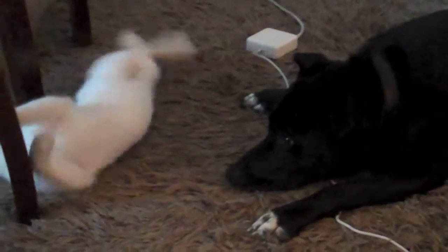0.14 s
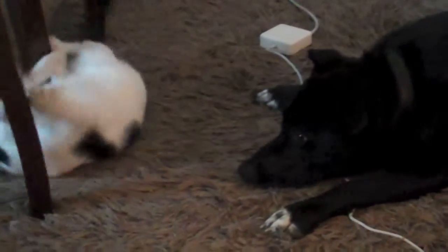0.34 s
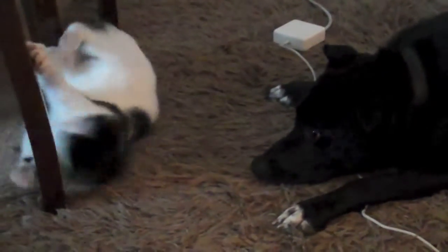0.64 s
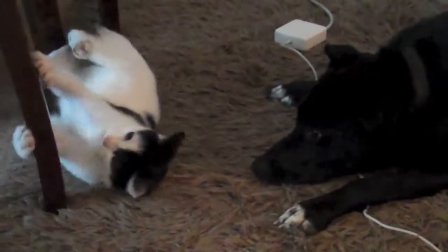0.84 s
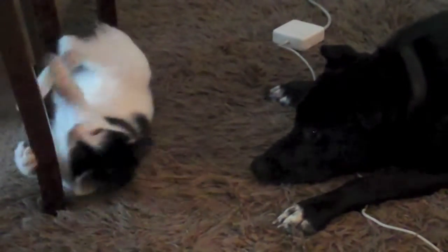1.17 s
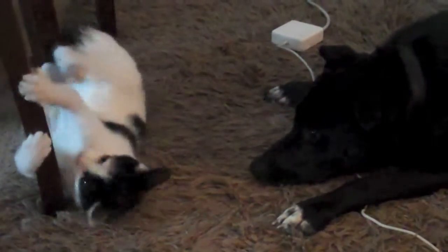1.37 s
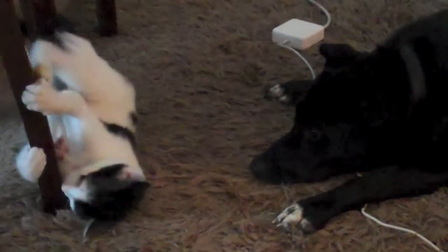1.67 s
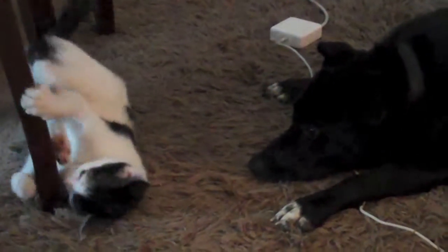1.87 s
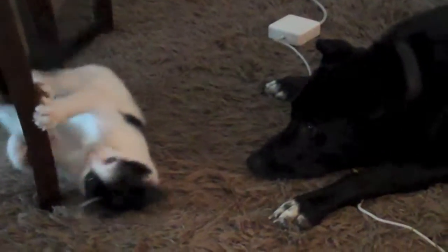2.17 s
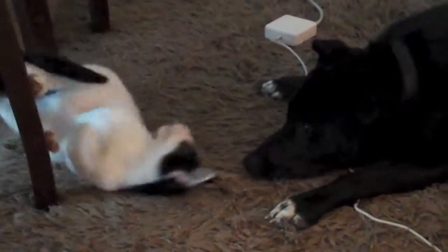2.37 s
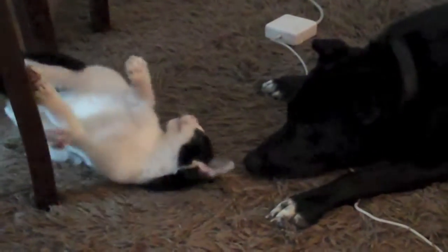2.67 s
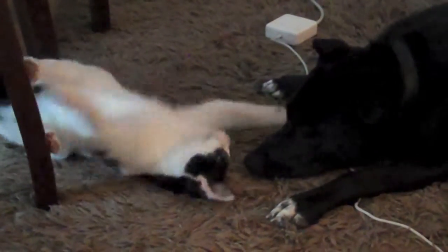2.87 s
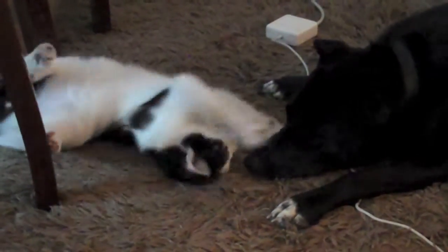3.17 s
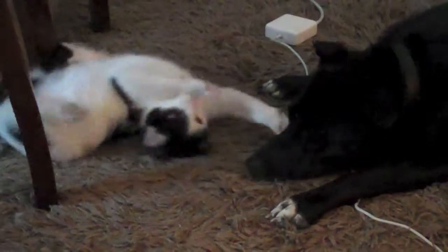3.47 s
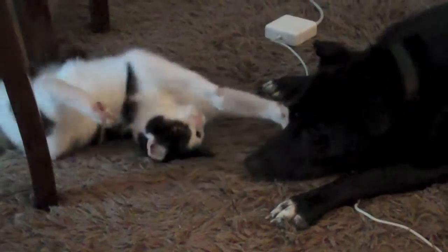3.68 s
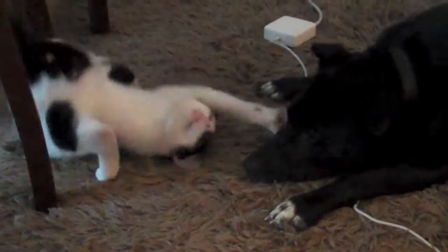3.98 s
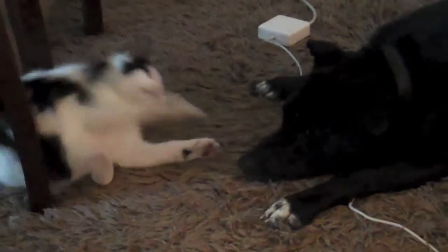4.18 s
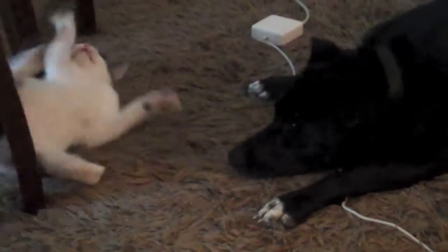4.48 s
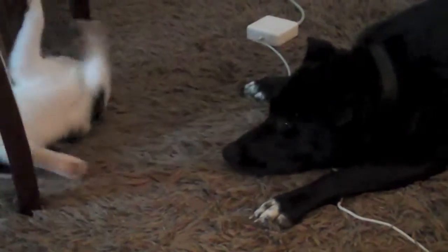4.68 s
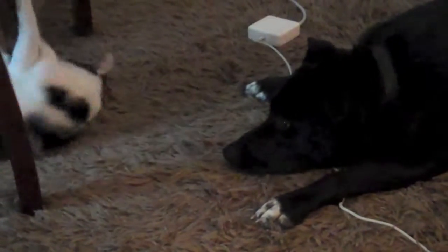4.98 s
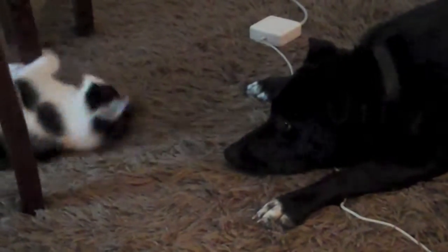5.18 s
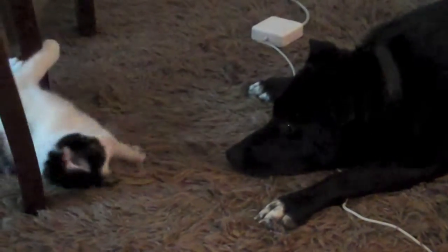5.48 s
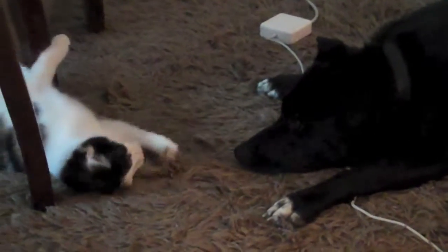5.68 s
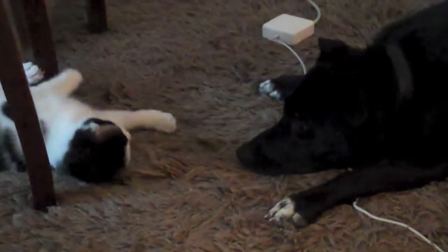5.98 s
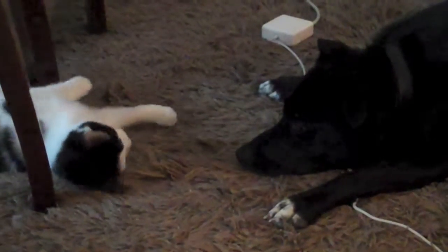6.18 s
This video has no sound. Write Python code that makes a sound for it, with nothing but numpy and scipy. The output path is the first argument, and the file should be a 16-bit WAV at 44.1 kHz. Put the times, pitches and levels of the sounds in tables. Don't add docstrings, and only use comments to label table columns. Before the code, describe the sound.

A kitten rolls on shaggy carpet, fur rustling, paws softly thumping and claws ticking on a wooden chair leg, before one loud close snap.

```python
import sys
import numpy as np
from scipy import signal
from scipy.fft import rfft, irfft, next_fast_len
from scipy.io import wavfile
from scipy.ndimage import uniform_filter1d, map_coordinates

SR = 44100
rng = np.random.default_rng(int(sys.argv[2]) if len(sys.argv) > 2 else 0)


def ratio(d):
    e = np.asarray(d, float) / 20
    return 10 ** e


def wrap_up_sound(samples):
    columns = np.atleast_2d(samples).T
    tamed = np.clip(columns, -1, 1)
    steps = np.round(tamed * 32767).astype(np.int16)
    wavfile.write(sys.argv[1], SR, steps)


N = 279594
TAIL = SR // 4

# pitch_hz, level_db (per Hz)
HISS_SUM = [(12, -31), (20, 9), (43, 2), (80, -2), (270, -2), (484, -2.5), (966, -3.5), (1310, -12.5),
            (1780, -4.5), (4690, -7), (6180, -10), (13800, -11), (15000, -46)]
HISS_DIFFERENCE = [(20, -18), (200, 0), (600, -5), (1270, -6.5), (1640, -5), (2280, -10), (5850, -15),
                   (13400, -17.5), (15000, -25)]
# pitch_hz, left_minus_right_db
HISS_LEAN = [(60, -0.5), (180, 1.5), (540, 6.5), (1620, 6.5), (4870, 2), (14600, 1)]
# time_s, pitch_hz, level_db, left_minus_right_db
LENS_WHINE = [
    (0.0, 7820, -54.5, -1.0),
    (0.352, 7811, -51.5, 2.5),
    (0.39, 7813, -54.5, 1.5),
    (0.446, 7700, -74, 20),
    (0.456, 7870, -65, 12.5),
    (0.48, 7810, -94, 9.0),
]
# time_s, level_db
RUSTLE_LEVEL = [(0.0, -64), (0.35, -67), (0.58, -62.5), (0.83, -69.5), (1.3, -64), (1.78, -66.5), (2.19, -65),
                (2.59, -68), (3.78, -68.5), (3.99, -63), (4.26, -63.5), (4.6, -66.5), (4.86, -64.5), (5.12, -62),
                (5.28, -68), (5.65, -63), (6.04, -68.5), (6.34, -71)]
# pitch_hz, level_db
FUR_COLOUR = [(1500, -31), (2600, -4), (4100, -4), (5000, -3.5), (6000, 0), (7900, -2), (9500, -12.5),
              (14000, -19)]
DRAG_COLOUR = [(80, -12.5), (160, 0.5), (400, -5.5), (850, 1.5), (1500, -0.5), (2500, -9), (5000, -39.5)]
# start_s, level_db (peak), pitch_hz
THUMPS = [(0.068, -56, 155), (0.29, -42, 226), (0.334, -53.5, 266), (0.644, -53, 436), (0.782, -51.5, 156),
          (1.209, -56, 167), (1.329, -53.5, 166), (1.788, -54.5, 220), (2.079, -54, 194), (3.096, -53, 318),
          (3.13, -59, 126), (4.036, -54.5, 135), (4.198, -41, 281), (4.322, -41, 240), (4.345, -48, 167),
          (4.4, -52.5, 157), (4.881, -54, 152), (4.92, -59, 154), (5.593, -36, 360)]
# start_s, level_db (peak), pitch_hz
KNOCKS = [(0.279, -45.5, 810), (0.645, -40, 468), (0.654, -60, 1020), (0.771, -44, 1554), (1.04, -46, 1460),
          (1.213, -46, 840), (1.993, -50.5, 1400), (2.082, -51.5, 640), (3.897, -58, 900),
          (4.181, -53, 646), (4.202, -42, 507), (4.212, -46, 804), (4.323, -45.5, 794), (4.336, -52, 600),
          (4.564, -51, 420), (4.883, -50.5, 408), (5.574, -48, 440)]
# start_s, level_db (peak), pitch_hz, stroke_s
SCUFFS = [(0.318, -47.5, 3670, 0.042), (0.3914, -45, 5800, 0.025), (0.4404, -43, 5380, 0.039),
          (0.633, -41, 4200, 0.04), (0.6512, -42, 4870, 0.026), (0.6584, -61, 4100, 0.025),
          (0.7716, -40.5, 5470, 0.019), (1.0865, -51, 2800, 0.023), (1.2444, -55, 4100, 0.03),
          (1.657, -50.5, 4080, 0.023), (1.813, -46, 4040, 0.024), (1.977, -54, 8000, 0.041),
          (2.1256, -48, 4710, 0.043), (2.3176, -46.5, 7360, 0.058), (2.7626, -43.5, 6500, 0.18),
          (2.7894, -52, 6160, 0.04), (2.9372, -54, 4170, 0.047), (3.41, -44.5, 7000, 0.017),
          (3.7743, -46.5, 5920, 0.034), (3.7892, -48.5, 6150, 0.044), (4.631, -47, 6050, 0.056),
          (4.7147, -34.5, 5420, 0.017), (4.8908, -37.5, 6640, 0.019), (5.2174, -52.5, 2770, 0.041),
          (6.0194, -55, 4160, 0.06), (6.2912, -55, 4050, 0.031), (6.2986, -43, 6960, 0.077)]
# start_s, level_db (peak), pitch_hz
TICKS = [(0.532, -48, 5930), (0.578, -55, 7960), (0.646, -44, 4200), (0.6993, -36, 4230),
         (0.7716, -42, 2600), (1.1027, -45, 3020), (1.2146, -44, 4130), (1.3314, -38.5, 5770),
         (1.3375, -42.5, 2550), (2.1125, -46, 5900), (2.1318, -45, 4500), (2.2855, -33.5, 6070),
         (2.329, -47, 7700), (4.2028, -40.5, 6100), (4.4024, -51, 5390), (4.6422, -40, 6000),
         (4.891, -41, 6600), (5.5199, -58, 3570)]
# start_s, level_db (peak), pitch_hz
SCRAPES = [(0.6464, -42.5, 1850), (0.6544, -51, 2890), (1.3369, -50, 2390), (2.2852, -50, 2450),
           (2.3221, -54, 2620), (4.3231, -49.5, 1750), (4.6423, -48.5, 3300), (4.7162, -49.5, 2740),
           (4.8923, -55, 2380)]
# start_s, level_db (peak), pitch_hz
LEG_RINGS = [(0.655, -49, 4020), (2.7734, -48, 4110), (2.938, -55.5, 4110)]
# start_s, level_db (peak), pitch_hz
PLUCKS = [(0.6962, -22.5, 5950), (2.7736, -27.5, 5650), (4.0588, -24, 5800), (4.0851, -18.5, 6300),
          (4.7156, -28, 5450)]
# time_s, pitch_hz, level_db
SQUEAK = [
    (3.838, 5850, -81),
    (3.844, 5770, -58),
    (3.852, 5500, -59),
    (3.86, 5200, -68),
    (3.868, 5100, -80),
]
# pitch_hz, level_db
FLOOR_COLOUR = [(40, -11), (100, 3.5), (160, 1), (250, 4.5), (450, 3), (900, -10), (2000, -7), (14000, -70)]
WOOD_COLOUR = [(100, -20.5), (400, -8), (850, 7), (1500, -4.5), (2000, -5.5), (3000, -15), (14000, -46)]
CLAW_COLOUR = [(300, -62), (1500, -11), (2200, -11.5), (2600, -5), (3300, -6), (4100, -7), (5000, -4.5),
               (6000, 3), (7000, -9.5), (7900, 0), (8800, -19), (9500, -25), (14000, -26)]
GRAIN_COLOUR = [(300, -2), (1000, 2), (1600, -6.5), (2800, 4.5), (4000, -8), (6000, -12), (14000, -46)]
LOOP_COLOUR = [(300, -58), (1500, -23), (2600, -12), (4200, -9), (6300, 5), (7900, 3.5), (9500, -19),
               (15000, -26)]
# start_s, level_db (peak)
SNAP = [
    (5.594, -8.5),
]
# pitch_hz, level_db
SNAP_LEFT = [(100, -46), (400, -33), (1500, -21.5), (2500, -24.5), (3700, -8.5), (4600, -12.5),
             (5800, -10.5), (6400, -10.5), (7200, -1), (8000, -2), (8800, -17), (9500, -23), (12500, -22.5),
             (14000, -38)]
SNAP_RIGHT = [(100, -45), (400, -41), (1500, -19), (2500, -27), (3700, -9), (4400, -15.5), (5200, -7),
              (6400, -7.5), (7000, -12), (7900, -15), (8800, -28), (9500, -24), (12500, -43), (14000, -34)]
# pitch_hz, level_db, t60_s, left_minus_right_db
SNAP_PORT_RINGS = [(7340, -0.5, .016, 8), (8424, -7.5, .014, 15.5), (6300, -3, 0.0056, 3), (5200, -10, .008, 2),
                   (3770, -8.5, 0.016, -1.5)]
# pitch_hz, t60_s
ROOM_DECAY = [(150, 0.46), (600, 0.37), (2000, 0.23), (10000, 0.26)]
# pitch_hz, difference_to_sum_db
ROOM_WIDTH = [(200, -12), (1500, -10), (3000, -2.5), (6000, 1.5)]


def unit(x):
    return x / np.sqrt(np.mean(x ** 2) + 1e-20)


def along(points, hz):
    f, v = np.transpose(points)
    return np.interp(np.log(hz + 1), np.log(f + 1), v)


def curves(rows):
    s, *cols = np.transpose(rows)
    return [np.interp(np.arange(N) / SR, s, c) for c in cols]


def coloured(x, *spectra):
    m = next_fast_len(x.shape[-1] + TAIL)
    hz = np.fft.rfftfreq(m, 1 / SR)
    level_db = sum(along(s, hz) for s in spectra)
    cepstrum = irfft(np.log(ratio(level_db)), m)
    cepstrum[1:m // 2] *= 2
    cepstrum[m // 2 + 1:] = 0
    return irfft(rfft(x, m) * np.exp(rfft(cepstrum)), m)[..., :x.shape[-1]]


def response(spectrum):
    return coloured(signal.unit_impulse(TAIL // 8), spectrum)


def pan(db):
    return ratio(np.multiply.outer([.5, -.5], db))


def tone(rows):
    hz, db = curves(rows)[:2]
    t = np.arange(N) / SR
    sounding = (t >= rows[0][0]) * (t < rows[-1][0])
    return 2 * np.pi * np.cumsum(hz) / SR, np.sqrt(2) * ratio(db) * sounding


def room(hit, spread, wet_db):
    hz, t, z = signal.stft(rng.standard_normal((2, TAIL)), SR, nperseg=256)
    z[1] *= ratio(along(ROOM_WIDTH, hz))[:, None]
    decay = ratio(-60 * t / along(ROOM_DECAY, hz)[:, None])
    mid, side = signal.istft(z * decay, SR, nperseg=256)[1][:, :TAIL]
    first_walls = np.clip(np.arange(TAIL) / SR / 0.0035 - 1, 0, 1)
    tail = np.array([mid + side, mid - side]) * first_walls
    spread = spread * np.linalg.norm(hit) / np.linalg.norm(spread)
    wet = signal.fftconvolve(spread, tail / np.linalg.norm(tail[0]), axes=1)[:, :TAIL]
    direct = np.pad(hit, ((0, 0), (0, TAIL - hit.shape[1])))
    return direct + ratio(wet_db) * wet


def add(track, s, sound):
    track[:, round(s * SR):][:, :sound.shape[1]] += sound


def contacts(rows, body, t60_s, cycles, wet_db, far, ring, dulls, rise, lead, wander, gain_db, side_db):
    track, t = np.zeros((2, N + TAIL)), np.arange(TAIL // 3) / SR
    knock = response(body)
    sides = pan(side_db)[:, None]
    usual_db, usual_hz = np.mean(rows, axis=0)[1:3]
    for s, db, hz, *stroke in rows:
        t60 = max(t60_s + sum(stroke) + cycles / hz, 1e-3)
        share = np.clip(ring * (usual_hz / hz) ** dulls, 0, 1)
        swell = (1 - np.exp(-t / (rise * t60))) * ratio(-60 * t / t60)
        grit = rng.standard_normal(len(t)) * swell
        grit[0] = -lead
        burst = signal.fftconvolve(grit, knock)[:len(t)]
        looseness = wander * np.sqrt(hz / SR) * min(t60 * hz / 200, 1) / 4
        slip = np.cumsum(rng.standard_normal(len(t))) * looseness
        ringing = np.sin(2 * np.pi * hz * t + slip) * swell / swell.max()
        hit = (1 - share) * burst / np.abs(burst).max() + share * ringing
        spread = (1 - share) * unit(knock) + share * unit(ringing[:len(knock)])
        distance_db = wet_db + far * (usual_db - db)
        sound = room(ratio(db + gain_db) * hit * sides, spread * sides, distance_db)
        add(track, s + 0.001188, sound)
    return track[:, :N]


def hiss():
    mid = ratio(-65) * unit(coloured(rng.standard_normal(N), HISS_SUM))
    side = ratio(-62.5) * unit(coloured(rng.standard_normal(N), HISS_DIFFERENCE))
    half = [(hz, db / 2) for hz, db in HISS_LEAN]
    opposite = [(hz, -db) for hz, db in half]
    return np.array([coloured(mid + side, half), coloured(mid - side, opposite)])


def frame_sag():
    frame_hz = 30.01
    frame = np.arange(int(N / SR * frame_hz))
    late, second, skip, size = rng.random((len(frame), 4)).T
    start = frame / frame_hz + .0155 + .005 * late ** 2
    loads, t = np.zeros((2, N + TAIL)), np.arange(TAIL // 8) / SR
    loads[0, (start * SR).astype(int)] = (skip > .04) * (.5 + 0.67 * size)
    second_start = start + .002 + .006 * second
    loads[1, (second_start * SR).astype(int)] = (skip > .4) * 0.62
    rise = 1 - np.exp(-t / 0.00073)
    dip = rise * (.5 * np.exp(-t / 0.0054) + 0.42 * np.exp(-t / 0.013))
    regulator = 0.69 * np.sin(2 * np.pi * 1650 * t) * rise * np.exp(-t / 0.0016)
    second_dip = rise * np.exp(-t / 0.0057)
    sag = signal.fftconvolve(loads, [dip + regulator, second_dip], axes=1).sum(0)[:N]
    sag -= uniform_filter1d(sag, int(.06 * SR))
    return ratio(-45.5) * sag * [[-.95], [1.05]]


def whine():
    phase, gain = tone(LENS_WHINE)
    return gain * pan(curves(LENS_WHINE)[2]) * np.sin(phase + [[.6], [-.6]])


def rustle():
    fur_db, = curves(RUSTLE_LEVEL)
    drag_db = -65.5 + 0.22 * (fur_db - fur_db.mean())
    clump_hz = 40
    knots = rng.standard_normal(int(N * clump_hz / SR) + 4)
    clumps = ratio(2.2 * map_coordinates(knots, [np.arange(N) * clump_hz / SR]))
    releases = rng.random(N) < 400 / SR
    grains = releases * ratio(2.6 * rng.exponential(size=N)).clip(0, 8) * rng.standard_normal(N)
    fur = clumps * (0.17 * grains + 0.44 * rng.standard_normal((2, N)))
    drag = clumps ** .5 * (rng.standard_normal(N) + 0.32 * rng.standard_normal((2, N)))
    fur = ratio(fur_db + 1.5) * unit(coloured(fur, FUR_COLOUR))
    return fur + ratio(drag_db - 4.0) * unit(coloured(drag, DRAG_COLOUR))


def thumps():
    return contacts(THUMPS, FLOOR_COLOUR, t60_s=0.023, cycles=17.3, wet_db=-4, far=0.085, ring=0.39, dulls=0.61,
                    rise=0.041, lead=0, wander=2.4, gain_db=-1.5, side_db=0.7)


def knocks():
    return contacts(KNOCKS, WOOD_COLOUR, t60_s=0.024, cycles=4.7, wet_db=2, far=.3, ring=0.39, dulls=-0.35,
                    rise=.069, lead=4.2, wander=2.2, gain_db=0.5, side_db=1.1)


def scuffs():
    return contacts(SCUFFS, CLAW_COLOUR, t60_s=0, cycles=0, wet_db=3.5, far=.4, ring=0.28, dulls=1.1,
                    rise=0.067, lead=0, wander=4.1, gain_db=-1, side_db=1)


def ticks():
    return contacts(TICKS, CLAW_COLOUR, t60_s=0.0064, cycles=0, wet_db=-5.5, far=.05, ring=0.51, dulls=0.25,
                    rise=0.015, lead=3.8, wander=1.1, gain_db=4, side_db=1)


def scrapes():
    return contacts(SCRAPES, GRAIN_COLOUR, t60_s=0.017, cycles=0, wet_db=5.8, far=0.19, ring=0.3, dulls=.2,
                    rise=0.07, lead=0, wander=0.97, gain_db=3.7, side_db=2)


def leg_rings():
    return contacts(LEG_RINGS, CLAW_COLOUR, t60_s=0.04, cycles=0, wet_db=-18, far=2.9, ring=0.6, dulls=0,
                    rise=.1, lead=0, wander=0.25, gain_db=3.5, side_db=1)


def plucks():
    return contacts(PLUCKS, LOOP_COLOUR, t60_s=0.0015, cycles=0, wet_db=-6.5, far=.05, ring=0.28, dulls=0,
                    rise=0.011, lead=2.7, wander=.3, gain_db=-2.5, side_db=5)


def squeak():
    phase, gain = tone(SQUEAK)
    return gain * np.sin(phase)


def snap():
    (s, db), = SNAP
    ports = np.array([response(SNAP_LEFT), response(SNAP_RIGHT)])
    t = np.arange(TAIL // 8) / SR
    breaks = 0
    for lag_s, size in [(0, 0.89), (.0008, 0.43), (.0017, 0.45), (.0029, 0.6)]:
        breaks = breaks + size * np.roll(ports, round(lag_s * SR), axis=1)
    port_ring = 0
    for hz, level_db, t60, side_db in SNAP_PORT_RINGS:
        decay = ratio(level_db - 60 * t / t60)
        port_ring = port_ring + pan(side_db)[:, None] * decay * np.sin(2 * np.pi * hz * t)
    onset = 1 - np.exp(-(t / 0.00035) ** 2)
    crack = breaks / np.abs(breaks).max() + ratio(0.5) * port_ring * onset
    track = np.zeros((2, N + TAIL))
    add(track, s, room(ratio(db + 5.5) * crack / np.abs(crack).max(), ports, wet_db=0.0))
    return track[:, :N]


def scene():
    camera = hiss() + frame_sag() + whine()
    body = rustle() + thumps()
    chair = knocks() + scrapes() + leg_rings() + squeak()
    claws = scuffs() + ticks() + plucks()
    return camera + body + chair + claws + snap()


def low_pass(x):
    return signal.sosfilt(signal.butter(12, 15210, fs=SR, output="sos"), x)


def record(dry):
    kept = np.fft.rfftfreq(N, 1 / SR) < 14250
    mix = irfft(rfft(dry) * kept, N)
    return low_pass(mix)


dry = scene()
out = record(dry)
wrap_up_sound(out)
```